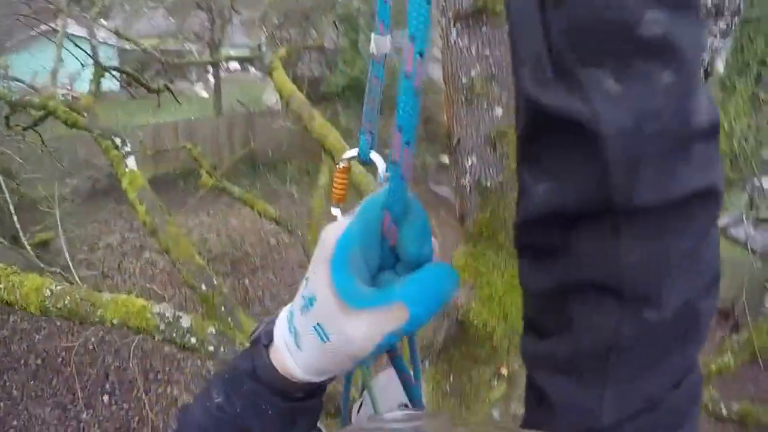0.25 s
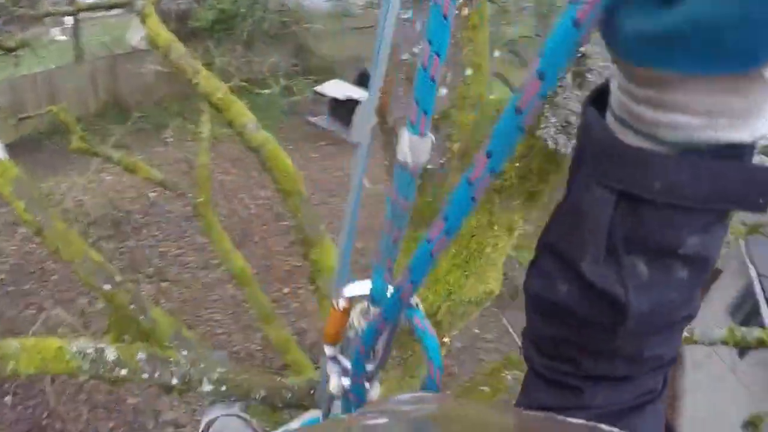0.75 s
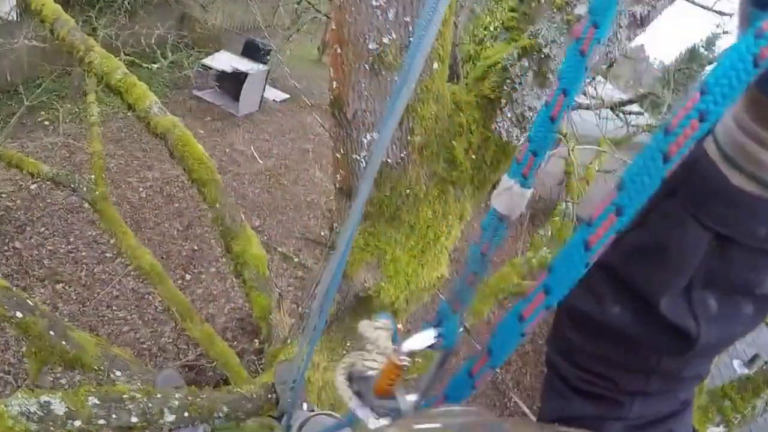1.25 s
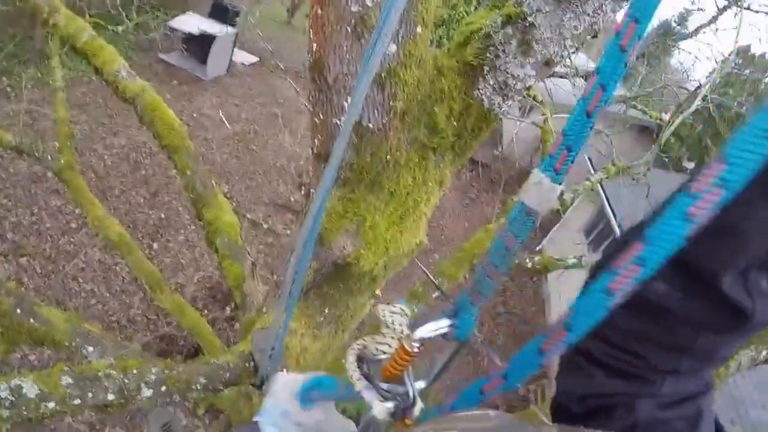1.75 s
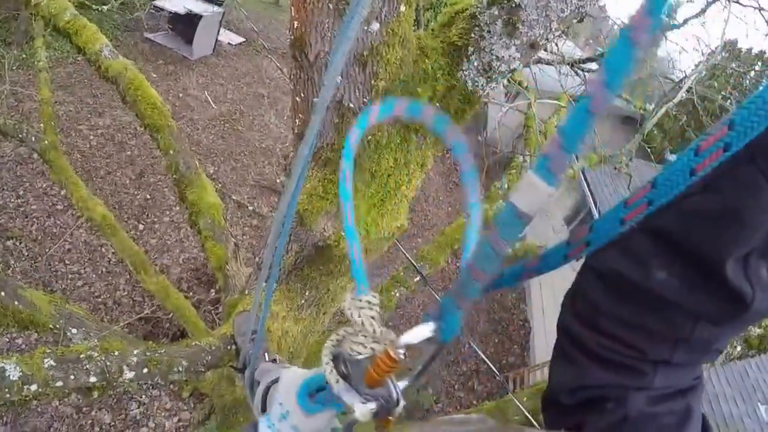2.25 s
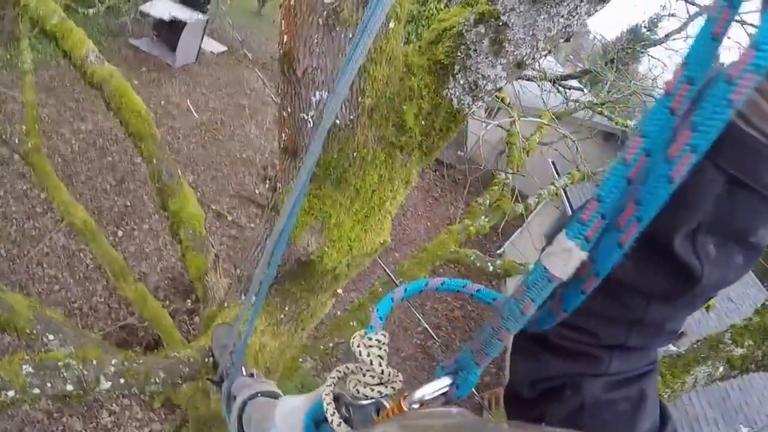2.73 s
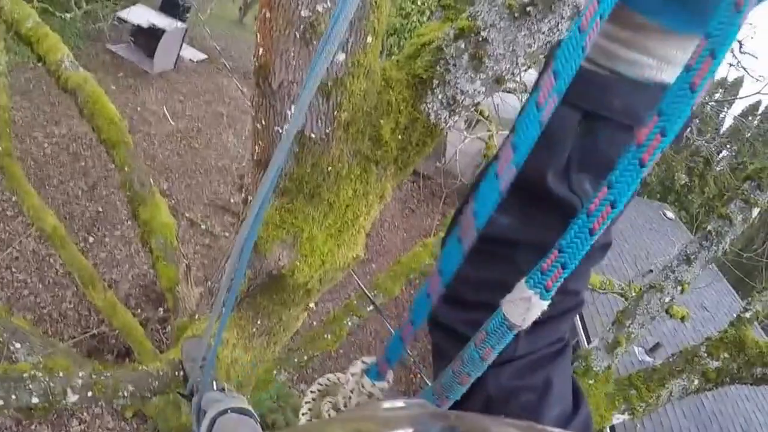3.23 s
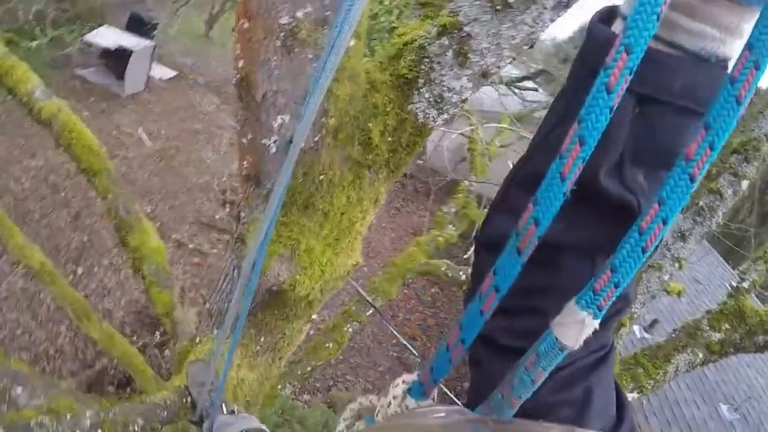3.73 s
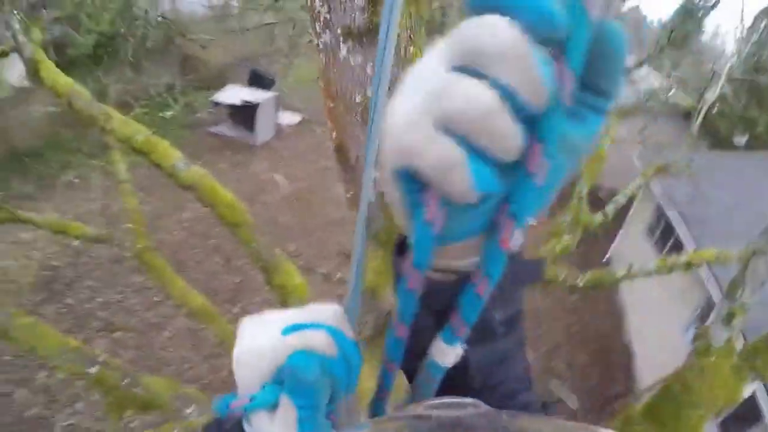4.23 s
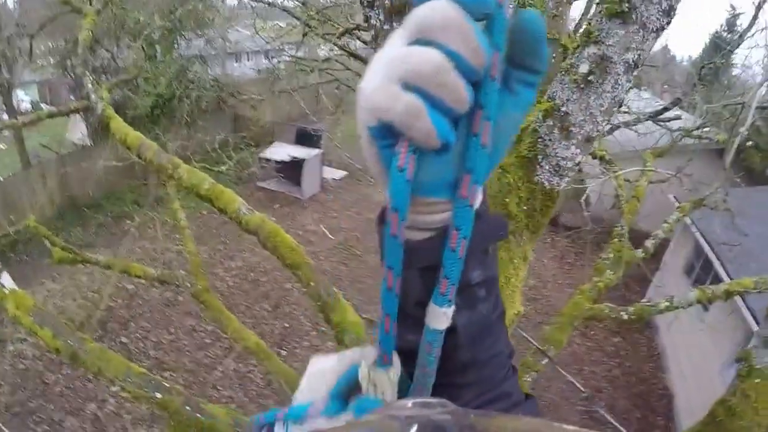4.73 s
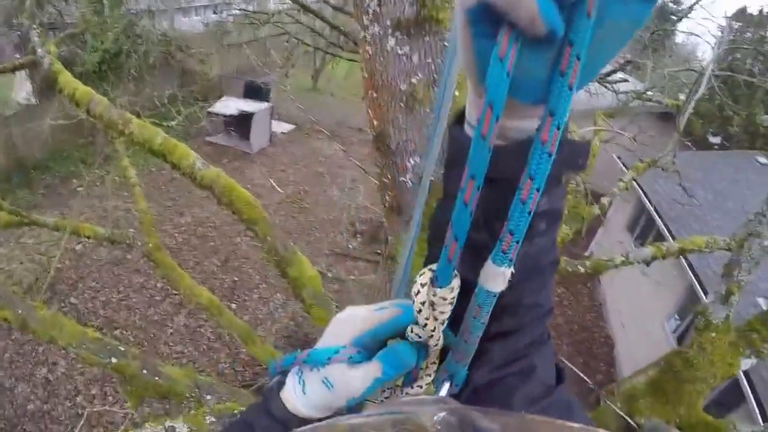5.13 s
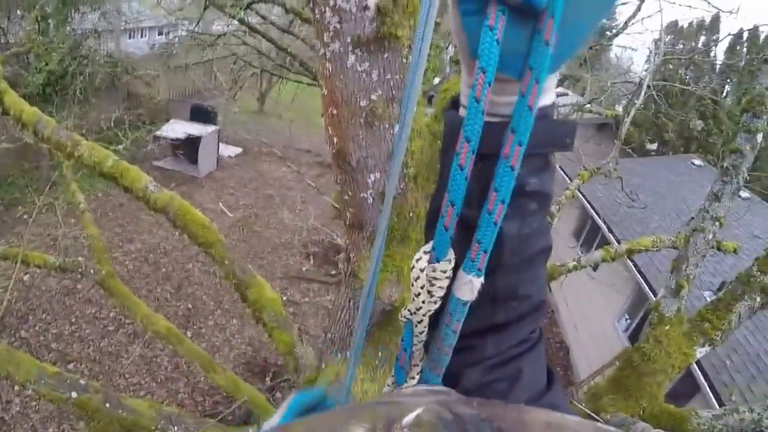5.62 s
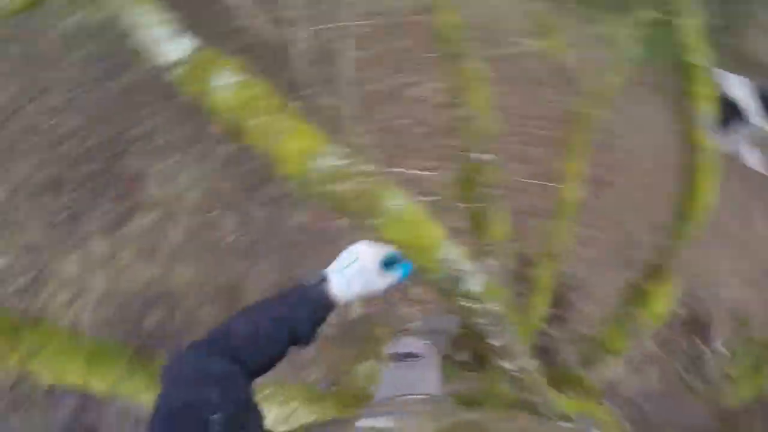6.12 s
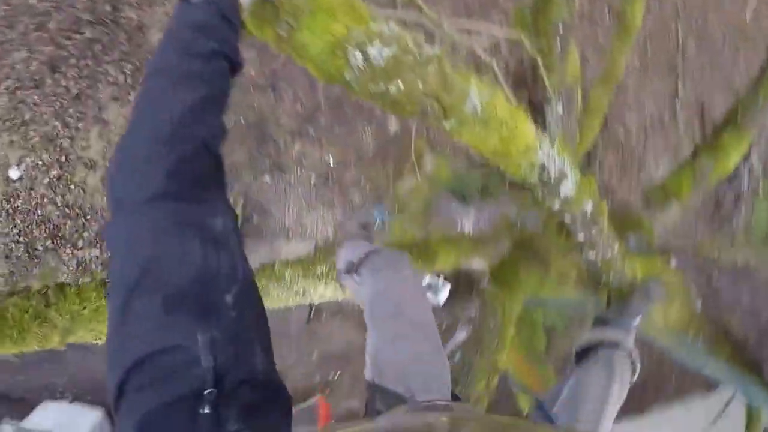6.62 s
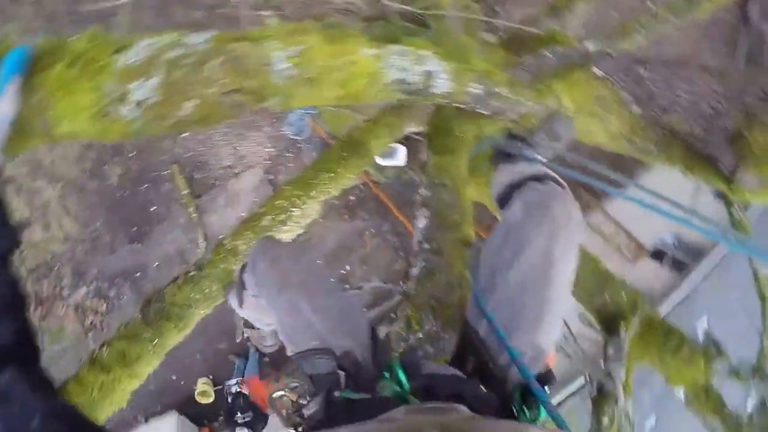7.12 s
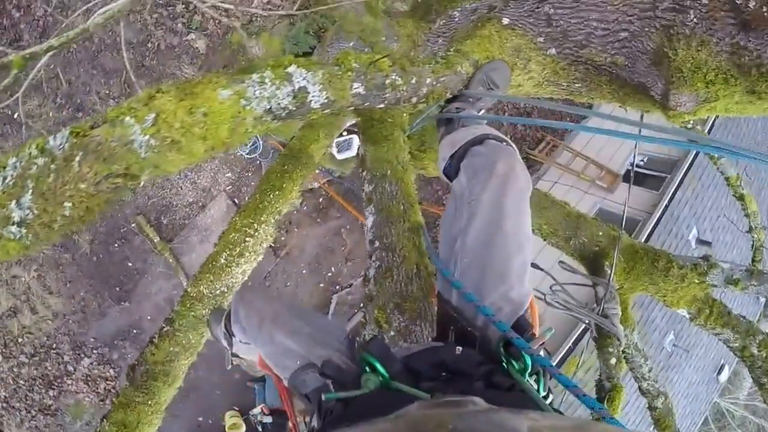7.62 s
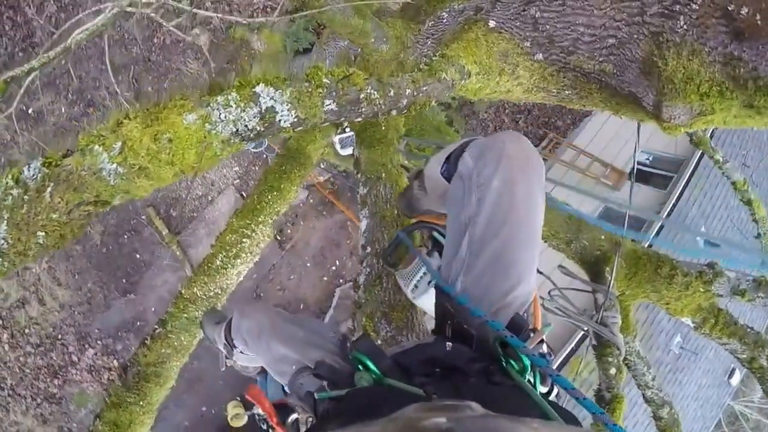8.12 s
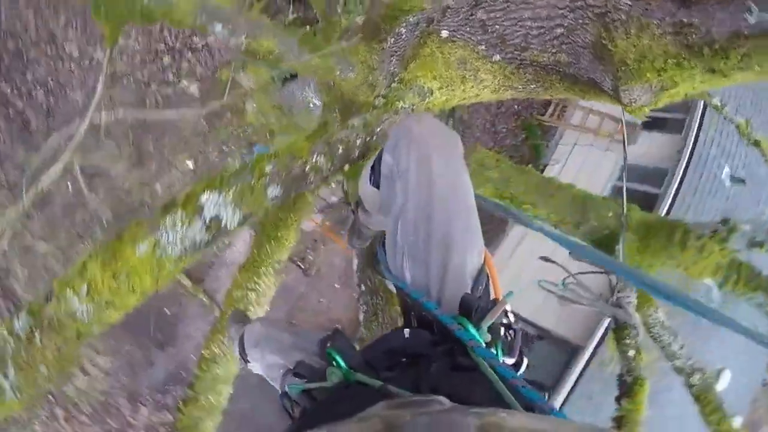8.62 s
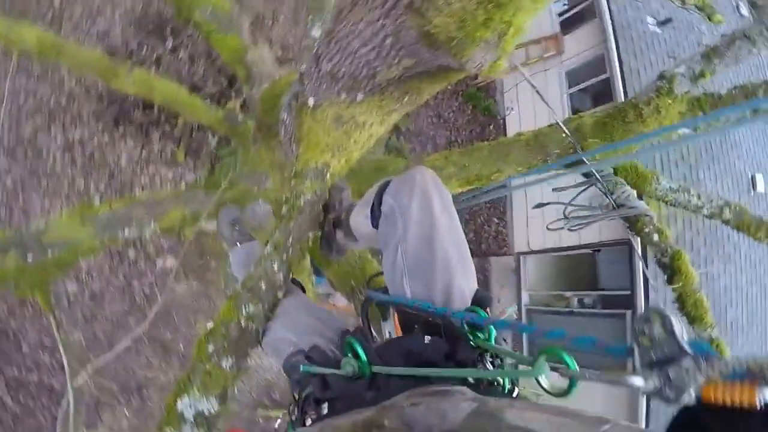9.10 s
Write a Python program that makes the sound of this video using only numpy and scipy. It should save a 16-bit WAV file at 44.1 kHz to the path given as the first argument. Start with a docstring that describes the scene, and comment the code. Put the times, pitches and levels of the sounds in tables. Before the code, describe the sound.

A steady but lumpy two-stroke idle runs throughout, hard firings every few turns with weak sputters between. Low air rumble and cloth scuffs buffet the encased wearable microphone. Gear raps the housing near the middle and again two thirds through, rope rubs softly, and clips click. As the hanging saw swings round, its metallic chatter comes forward with a shifting, hollow colour. Open air, almost no reverberation.

```python
"""High in a tree, a two-stroke chainsaw idles on a climber's harness, heard by a small camera in a housing.
It pops every turn, fires hard about every fourth and sputters in between: pulses at each turn of the
crankshaft ring the muffler, and grainy noise swelling with them makes the case, clatter and chain.
Late on the saw swings round and its clatter comes forward, through moving comb reflections.
Metal clips click, gear knocks, rope and cloth rub, and moving air buffets the microphone."""
import sys
import numpy as np
from scipy import signal
from scipy.fft import rfft, irfft
from scipy.io import wavfile
from scipy.ndimage import uniform_filter1d

SR = 44100
rng = np.random.default_rng(int(sys.argv[2]) if len(sys.argv) > 2 else 0)


def transcribe(u):
    """Save the signal u as a 16-bit wav file named by the first command-line argument.

    u: samples, shape (n,) or (channels, n), limited to [-1, 1]; the rate is SR.
    q: integer samples, one column per channel.
    """
    v = np.clip(np.atleast_2d(u).T, -1, 1)
    q = np.round(v * 32767).astype(np.int16)
    wavfile.write(sys.argv[1], SR, q)


N = 412776
TIME = np.arange(N) / SR
GATE_HZ, GATE_WIDTH_HZ = 7230, 74  # thin ring of the metal hardware on the harness


def undb(db):
    """Decibels to gain."""
    return 10 ** (np.asarray(db) / 20)


def unit(x):
    """Scale to an rms of one."""
    return x / np.sqrt(np.mean(x ** 2))


def curves(table):
    """Each column of a table, joined by straight lines in time."""
    s, *columns = np.transpose(table)
    return [np.interp(TIME, s, c) for c in columns]


def noise():
    """White noise."""
    return rng.standard_normal(N)


def colour(x, points, size=8192):
    """Pass a sound through a causal (minimum-phase) body with this spectrum, at unit power gain."""
    hz, db = np.transpose(points)
    log_hz = np.log(np.maximum(np.fft.rfftfreq(size, 1 / SR), 1))
    gain = undb(np.interp(log_hz, np.log(hz), db))
    # folding the cepstrum forward in time makes the body answer only after it is excited
    cepstrum = irfft(np.log(gain))
    cepstrum[1:size // 2] *= 2
    cepstrum[size // 2 + 1:] = 0
    response = irfft(np.exp(rfft(cepstrum)))
    return signal.fftconvolve(x, response / np.linalg.norm(response))[:N]


def resonance(x, hz, width):
    """One resonance, gain one at its centre."""
    return signal.lfilter(*signal.iirpeak(hz, hz / width, SR), x)


def strikes(times, sizes):
    """One impulse at each moment."""
    out = np.zeros(N)
    samples = np.clip(np.asarray(times) * SR, 0, N - 1).astype(int)
    np.add.at(out, samples, sizes)
    return out


def fade(x, decay_s):
    """Give each impulse an exponential tail."""
    return signal.lfilter([1], [1, -np.exp(-1 / (abs(decay_s) * SR))], x)


def burst(times, sizes, rise_s, decay_s):
    """Envelopes that swell up to each moment and die away after it."""
    hits = strikes(times, sizes)
    swelling = fade(hits[::-1], rise_s)[::-1]
    return fade(hits, decay_s) + swelling - hits


def bell(s, length):
    """A smooth swell and fade around a moment."""
    return np.exp(-2 * ((TIME - s) / length * 2) ** 2)


def grit(grain_db, grain_s):
    """Noise made of many tiny contacts of uneven strength."""
    steps = np.arange(0, N / SR + grain_s, grain_s)
    strength = np.clip(noise()[:len(steps)], -2, 2)
    return unit(noise() * undb(grain_db * np.interp(TIME, steps, strength)))


def strokes(table, grain_db=4):
    """Fibres catch and slip: grainy noise that swells and fades with each stroke."""
    swell = sum(undb(db) * bell(s, length) for s, length, db in table)
    grain = unit(uniform_filter1d(noise(), size=120))
    return swell * unit(noise() * undb(grain_db * grain))


def gliding(x, hz, width):
    """A steep resonance whose centre moves: shift the centre to zero, smooth twice, shift back."""
    turn = np.exp(2j * np.pi * np.cumsum(hz) / SR)
    tail_s = 1 / (np.pi * width)
    return np.real(turn * fade(fade(x / turn, tail_s), tail_s))


def reflect(x, surface):
    """Add a surface's moving reflection: a slowly gliding comb."""
    hz, share = curves(surface)
    late = np.interp(TIME - 1 / hz, TIME, x)
    return (x + share * late) / np.sqrt(1 + share ** 2)


def shell(x):
    """The plastic housing rings with its modes and passes little bass or treble."""
    # the camera housing's modes: (centre [Hz], width [Hz], gain [dB])
    housing_modes = [(663, 170, 7), (1197, 110, 8), (1440, 136, 13.5), (1970, 230, -13), (2265, 110, 7.5),
                     (2610, 120, -29), (5570, 100, 2)]
    modes = sum(undb(db) * resonance(x, hz, width) for hz, width, db in housing_modes)
    return signal.sosfilt(signal.butter(2, [500, 4000], "band", fs=SR, output="sos"), modes)


def hiss(level_db=-71):
    """Faint steady noise, drawn afresh for each channel."""
    # colour of the hiss: (frequency [Hz], relative level [dB])
    hiss_colour = [(30, 7), (70, -16), (250, 8), (700, -6), (1500, 0), (3200, 3), (6000, -6), (10000, -22),
                   (15000, -15)]
    return undb(level_db) * colour(noise(), hiss_colour)


def eddies(points, size=4000):
    """Low turbulence of even strength."""
    x = colour(noise(), points)
    return x / np.sqrt(uniform_filter1d(x ** 2, size=size))


def air():
    """Light air plays on the microphone; each gust adds a swell of rumble and flutter."""
    # light air that never stops: (time [s], rumble [dB], flutter [dB])
    breeze = [(0, -37, -44.5), (1.8, -35.5, -58.5), (3.7, -38, -55), (4.6, -37.5, -49.5), (6.3, -34, -50.5),
              (7.8, -37.5, -52), (9.36, -32, -53.5)]
    # gusts on the microphone as the climber moves: (time [s], length [s], rumble [dB], flutter [dB])
    gusts = [(0.056, 0.33, -27.5, -50), (0.317, 0.16, -23.5, -40.5), (1.378, 0.36, -24, -48),
             (1.523, 0.17, -25, -40), (1.88, 0.11, -26, -61), (3.04, 0.17, -26.5, -78),
             (4.031, 0.1, -23.5, -34.5), (4.17, 0.22, -23, -37.5), (4.384, 0.33, -20, -33.5),
             (4.747, 0.69, -31, -44.5), (6.192, 0.25, -27, -33.5), (6.63, 0.28, -28, -66),
             (7.283, 0.58, -36, -66), (8.154, 0.08, -31, -39), (8.462, 0.12, -41, -39.5),
             (8.791, 0.17, -31.5, -37), (8.984, 0.2, -33.5, -49)]
    # colour of the deep rumble: (frequency [Hz], relative level [dB])
    rumble_colour = [(8, 16.5), (20, 20), (33, 1), (45, 5.5), (65, 1), (100, -10), (200, -53), (3000, -110)]
    # colour of the flutter above it: (frequency [Hz], relative level [dB])
    flutter_colour = [(40, -12), (75, -12.5), (130, 2), (170, -17), (250, -21), (500, -80), (6000, -100)]
    rumble, flutter = undb(curves(breeze))
    for s, length, rumble_db, flutter_db in gusts:
        swell = bell(s, length)
        # independent gusts add in power
        rumble = np.hypot(rumble, undb(rumble_db) * swell)
        flutter = np.hypot(flutter, undb(flutter_db) * swell)
    return eddies(rumble_colour) * rumble + eddies(flutter_colour) * flutter


def bumps(cycles=0.17, soft=0.35):
    """Body movement reaches the microphone as heavily damped low swings with a padded onset."""
    # soft bumps of the climber's body: (time [s], level before damping [dB], pitch [Hz])
    body_bumps = [(0.302, 2.5, 28), (0.612, -10, 45), (0.754, -8, 59), (0.856, -12.5, 38),
                  (1.153, -29, 36.2), (1.405, -15, 45), (1.54, -8, 50), (1.85, -9, 30), (4.15, -6, 35),
                  (4.324, 1, 28), (4.354, -8, 128), (4.422, -11, 99), (6.149, -30, 105), (6.87, -11, 24.2),
                  (7.215, -8, 24)]
    out = 0
    for s, db, hz in body_bumps:
        phase = np.maximum(TIME - s, 0) * hz  # in cycles
        swing = np.sin(2 * np.pi * phase)
        padding = np.tanh(phase / soft)
        damping = np.exp(-np.minimum(phase / cycles, 20))
        out = out - undb(db) * swing * padding * damping
    return out


def rubs(scuff_db=7):
    """Rope hisses through its hitch; cloth scuffs reach the housing."""
    # rope and cloth sliding: (time [s], length [s], level [dB])
    slides = [(4.42, 0.13, -58), (4.806, 0.17, -54), (5.25, 0.21, -49.5), (6.84, 0.29, -53.5)]
    # gloves and sleeves scuffing: (time [s], length [s], level before scuff_db and the housing [dB])
    scuffs = [(.3, 0.36, -52), (1.47, 0.21, -54), (4.06, 0.056, -49.5), (4.305, 0.049, -48.5),
              (4.365, 0.033, -60), (4.44, 0.055, -44.5), (4.8, 0.54, -55), (6.17, 0.19, -52.5),
              (6.5, .1, -53), (8.96, .08, -48)]
    # colour of the sliding rope: (frequency [Hz], relative level [dB])
    rope_colour = [(700, -24), (1430, -9), (2400, -22), (2950, -12), (3250, 2), (3600, -5), (4100, -7),
                   (4600, -3), (5400, -18), (12000, -40)]
    return colour(strokes(slides), rope_colour) + undb(scuff_db) * shell(strokes(scuffs))


def knocks(blow_db=14, chatter_db=6, clack_rise_s=0.0005, scrape_db=-7, scrape_s=0.013):
    """Gear bumps the housing: a blow, a chatter in its shell, a scrape sliding off, the gear's dead clack."""
    # gear knocking near the camera:
    # (time [s], strength before the gains above [dB], clack pitch [Hz], clack peak [dB])
    gear_knocks = [(1.431, -44, 1070, -35), (1.452, -38, 1290, -35), (1.528, -44, 1450, -44),
                   (4.31, -42, 1530, -35), (4.321, -37, 1700, -31), (4.341, -34, 2830, -26),
                   (4.347, -24.5, 1580, -18.5), (4.353, -51, 680, -33), (4.416, -43, 1600, -39),
                   (6.1152, -23, 1570, -25), (6.122, -49, 660, -29), (6.1438, -37, 2380, -26),
                   (6.148, -48, 2280, -31), (6.202, -47, 1900, -38), (6.2136, -28, 1470, -20),
                   (6.231, -51, 1240, -33), (6.236, -47, 700, -34)]
    s, db, _, _ = np.transpose(gear_knocks)
    blow = strikes(s, undb(db + blow_db))
    chatter = noise() * burst(s + .0005, undb(db), .001, .0035)
    scrape = grit(grain_db=1, grain_s=0.0015) * fade(strikes(s, undb(db)), scrape_s)
    width = 1 / (np.pi * clack_rise_s)
    clacks = 0
    for start, _, hz, clack_db in gear_knocks:
        ring = resonance(resonance(strikes([start], [1]), hz, width), hz, width)
        clacks = clacks + undb(clack_db) * ring / abs(ring).max()
    return shell(blow + undb(chatter_db) * chatter + undb(scrape_db) * scrape) + clacks


def clips(ping_db=2, body_db=-10, snap_db=9, width_hz=900, contact_s=0.00091, chatter_s=0.0059):
    # metal clips snapping: (time [s], strength before the gains above [dB], ping pitch [Hz],
    # body re strength [dB], gate ring re strength [dB])
    snaps = [(0.5387, -24, 5700, 2, -44), (1.4516, -36, 5900, 1, -26), (6.1405, -24, 6000, -18, -36),
             (8.931, -31, 6400, 5.5, -4.5), (9.149, -22.5, 4640, -6, -17)]
    body_colour = [(500, -36), (1000, -1), (1250, 5), (1800, 10), (2300, 12), (2600, 4), (2950, 17),
                   (3600, 12), (6000, 1.5), (10000, -18), (13000, -31), (15500, -60)]
    ping, blows, gate = 0, 0, 0
    for s, db, hz, rel_db, gate_db in snaps:
        hit = strikes([s], [1])
        contact = hit + 0.6 * noise() * fade(hit, contact_s)
        ring = resonance(resonance(contact, hz, width_hz), hz, width_hz)
        ping = ping + ring / abs(ring).max() * undb(db + ping_db)
        blows = blows + hit * undb(db + rel_db)
        gate = gate + hit * undb(db + gate_db)
    # the factor undoes the narrow filter's loss on a single impulse
    thin = resonance(gate, GATE_HZ, GATE_WIDTH_HZ) * SR / (2 * np.pi * GATE_WIDTH_HZ)
    clack = undb(snap_db) * blows + undb(body_db) * fade(blows, chatter_s) * noise()
    return ping + thin + colour(clack, body_colour)


def firings(turns, stumble_db=1, scatter_db=2.5):
    """Extra force and thud of each turn: runs keep their beat; between them every third or fourth fires."""
    # runs in which the engine fires hard in a steady beat: (first firing [s], last firing [s],
    # beat [turns per firing], strength before scatter [dB], thud before scatter [dB])
    runs = [(.05, .256, 4, 4, -42), (.339, .498, 4, 3, -36), (.693, .86, 4, 2.5, -40),
            (1.107, 1.268, 4, 3, -41.5), (1.329, 1.449, 3, 3, -52), (1.51, 1.69, 3, 3, -50),
            (1.979, 2.245, 4, 3.5, -50), (2.329, 2.74, 4, 5.5, -52), (2.95, 3.08, 3, 4, -52),
            (3.165, 3.23, 3, 3.5, -47), (3.5, 3.684, 3, 5, -51), (3.786, 4.112, 4, 8, -54),
            (4.344, 4.919, 4, 4.5, -42), (5.2, 5.344, 4, 4.5, -39.5), (5.548, 6.038, 4, 7, -35.5),
            (6.12, 6.448, 4, 7, -55), (6.55, 6.61, 3, 3.5, -52), (6.768, 6.852, 4, 6.5, -49),
            (7.062, 7.145, 4, 5, -37.5), (7.208, 7.616, 4, 8.5, -31), (7.678, 7.741, 3, 6, -41),
            (7.865, 7.928, 3, 3.5, -44), (7.99, 8.237, 4, 5, -38.5), (8.298, 8.42, 2, 2.5, -46),
            (8.44, 8.926, 4, 7, -37), (9.025, 9.27, 3, 2, -41)]
    force, thud = np.zeros((2, len(turns)))
    scatter = undb(scatter_db * rng.standard_normal(len(turns)))
    stumbles = np.cumsum(rng.integers(3, 5, len(turns)))
    force[stumbles[stumbles < len(turns)]] = undb(stumble_db) - 1
    # clear the stumbles in and just around each run
    for start, end, *_ in runs:
        force[(turns > start - .05) & (turns < end + .05)] = 0
    for start, end, beat, db, thud_db in runs:
        first, last = np.argmin(abs(turns - start)), np.argmin(abs(turns - end))
        fired = slice(first, last + 1, max(round(beat), 1))
        force[fired], thud[fired] = undb(db) - 1, undb(thud_db)
    return force * scatter, thud * scatter


def crankshaft(jitter_s=0.00054, wander_s=0.00028):
    """Moment of every turn as the idle hunts around its mean speed, with its firing force and thud."""
    # crankshaft at idle: (time [s], count [turns completed])
    crank = [(0.008, 1), (0.2976, 15), (0.5587, 28), (0.7982, 40), (1.1064, 55), (1.3497, 67), (1.7932, 89),
             (2.207, 109), (2.5562, 126), (2.8896, 142), (3.1442, 154), (3.4577, 169), (3.8899, 190),
             (4.2586, 208), (4.5551, 222), (5.0782, 248), (5.6511, 276), (6.0999, 298), (6.39, 312),
             (6.7477, 330), (7.0382, 344), (7.3527, 359), (7.6977, 376), (7.9904, 390), (8.3598, 408),
             (8.7037, 425), (9.1077, 445), (9.345, 456)]
    s, count = np.transpose(crank)
    turns = np.interp(np.arange(count[0], count[-1] + 1), count, s)
    jitter, drift = rng.standard_normal((len(turns), 2)).T
    wander = unit(uniform_filter1d(uniform_filter1d(drift, size=5), size=4))
    force, thud = firings(turns)  # force is zero on a turn that does not fire hard
    return turns + jitter_s * jitter + wander_s * wander, force, thud


def puffs(turns, force, scatter_db=1.5):
    """Exhaust puff sizes: full at a firing, faint after, growing as mixture gathers; sputters set their own."""
    # exhaust puff on a firing and on each turn after it, before scatter: (level [dB])
    puff_steps = [0, -12, -12, -5, -2]
    # sputters, when the mixture burns late and every turn pops in the muffler:
    # (start [s], end [s], puff before scatter [dB])
    sputters = [(.49, .59, 2.5), (1.79, 1.88, -3.5), (2.82, 2.9, 3), (3.36, 3.44, 3), (4.15, 4.3, 7.5),
                (5.03, 5.1, 3.5), (5.44, 5.51, 3), (6.65, 6.73, -4), (6.92, 7.13, 2), (7.75, 7.85, 3),
                (8.28, 8.39, 0.5), (9.07, 9.14, 5.5)]
    count = np.arange(len(turns))
    since = count - np.maximum.accumulate(np.where(force > 0, count, 0))  # turns since a firing
    db = np.array(puff_steps, float)[np.minimum(since, len(puff_steps) - 1)]
    for start, end, sputter_db in sputters:
        db[(turns > start) & (turns < end)] = sputter_db
    return undb(db + scatter_db * np.clip(rng.standard_normal(len(turns)), -2, 2))


def covers(x, hollow_hz=2500, hollow_width_hz=200, hollow=0.14):
    """The saw's covers add their narrow rings and leave a hollow in between."""
    # narrow rings of the saw's covers and bar: (centre [Hz], width [Hz], gain [dB])
    cover_rings = [(1400, 70, -7), (2775, 30, 3), (3245, 30, -3), (4680, 200, -11)]
    rings = sum(undb(db) * resonance(x, hz, width) for hz, width, db in cover_rings)
    return x + rings - hollow * resonance(x, hollow_hz, hollow_width_hz)


def hollow_putts(turns, puff, width_hz=140, lead_s=0.0045, flow_db=-18):
    """Every exhaust puff rings one hollow note, which wanders as the saw swings."""
    # the hollow note of the exhaust pops: (time [s], centre [Hz], level [dB])
    hollow_note = [(4.5, 674, -78), (5.1, 634, -62), (6.0, 670, -69), (6.45, 684, -59), (6.8, 670, -63),
                   (7.0, 606, -57), (7.4, 670, -62), (7.85, 790, -66), (8.1, 810, -76), (8.35, 594, -53),
                   (8.7, 580, -71), (9.15, 585, -61)]
    hz, db = curves(hollow_note)
    pops = unit(strikes(turns - lead_s, puff)) + undb(flow_db) * noise()
    return undb(db) * unit(gliding(pops, hz, width_hz))


def whirrs(turns, force, lead_s=0.0103):
    """Each turn shakes the saw's covers; their resonances drift and swell as it swings on its strap."""
    # drifting bright resonances: (width [Hz], path of (time [s], centre [Hz], level [dB]))
    drifting = [(142, [(6.6, 2790, -86), (6.95, 2780, -64), (7.45, 2760, -76), (7.9, 2740, -69),
                (8.3, 2750, -56), (8.85, 2700, -50.5), (9.36, 2790, -55)]), (230, [(6.6, 3080, -83),
                (7.0, 3300, -62), (7.4, 3210, -56), (7.9, 3460, -57.5), (8.3, 3420, -48.5),
                (8.8, 3380, -60), (9.36, 3400, -58)]), (200, [(6.2, 4570, -82), (6.5, 4570, -62),
                (7.4, 4500, -66), (7.9, 4900, -61), (8.3, 4980, -60), (8.8, 4670, -72), (9.36, 4540, -62)]),
                (328, [(6.6, 5350, -78), (6.95, 5460, -58), (7.4, 5670, -65), (7.9, 5620, -60.5),
                (8.8, 5220, -65), (9.36, 5300, -72)])]
    shake = .15 + burst(turns - lead_s, 1 + .9 * (force > 0), 0.001, .0036)
    out = 0
    for width, path in drifting:
        hz, db = curves(path)
        out = out + undb(db) * unit(gliding(noise() * shake, hz, width))
    return out


def thuds(turns, sizes, lead_s=0.002926, buzz=0.071, buzz_s=0.0054):
    """A hard firing strikes the cylinder cover, which buzzes briefly and rings with two beating notes."""
    # the cylinder cover's notes under a hard firing: (centre [Hz], width [Hz], relative level [dB])
    cover_notes = [(1256, 37, -13), (1386, 100, -0.5)]
    hits = strikes(turns - lead_s, sizes)
    push = hits + buzz * noise() * fade(hits, buzz_s)
    # the factor undoes each narrow filter's loss on a single impulse
    return sum(undb(db) * resonance(push, hz, width) * SR / (2 * np.pi * width)
               for hz, width, db in cover_notes)


def rattle(turns, force, loose=0.014, jingle_db=-7, lead_s=0.00018, rise_s=.0014, decay_s=0.0055):
    """Every hard firing jolts the chain and the hardware it hangs from; the other turns only tick them."""
    # colour of the jolted chain: (frequency [Hz], relative level [dB])
    chain_colour = [(300, -45), (600, 6), (950, -8), (1380, 5), (2100, -14), (2800, -14), (3400, 7.5),
                    (4500, -0.5), (6000, -3), (8000, -4.5), (10000, -13.5), (13000, -11.5), (15500, -13)]
    jolt = burst(turns - lead_s, loose + force, rise_s, decay_s)
    chain = covers(colour(grit(grain_db=5.5, grain_s=0.00084) * jolt, chain_colour))
    return chain + undb(jingle_db) * resonance(chain, GATE_HZ, GATE_WIDTH_HZ)


def clatter(turns, force, lead_s=.007, tick=0.17):
    """Piston and clutch slap once a turn on the way up, harder before a firing: a tick and a short rattle."""
    # colour of the slap: (frequency [Hz], relative level [dB])
    slap_colour = [(450, 3.5), (630, 5.5), (950, -10.5), (1350, -1), (2200, 2.5), (2750, 8.5), (3350, 7),
                   (4200, 1), (5000, 4.5), (5700, -2.5), (6600, -11), (8200, -6.5), (10000, -27.5),
                   (12500, -15.5), (15500, -38)]
    size = undb(1.3 * rng.standard_normal(len(turns))) * (1 + 1.05 * (force > 0))
    slap = .22 + burst(turns - lead_s, size, .0009, .0052)
    ticks = unit(strikes(turns - lead_s, size))
    loose_metal = unit(grit(grain_db=2, grain_s=0.0018) * slap)
    return unit(covers(colour(loose_metal + tick * ticks, slap_colour)))


def engine_case(turns, force, throb=0.25, kick=1.8, lead_s=0.0011):
    """Flywheel fan and crankcase whirr on, swelling with each compression and more with a firing."""
    # colour of the engine case: (frequency [Hz], relative level [dB])
    case_colour = [(200, 7), (400, 3), (650, 0), (980, 1), (1200, 6.5), (1600, 6), (2200, 3), (2900, 1),
                   (3450, 1.5), (4600, -7), (6000, -11.5), (8000, -19), (10000, -22), (15000, -27)]
    size = undb(3 * rng.standard_normal(len(turns))) * (1 + kick * force)
    swell = burst(turns - lead_s, size, .003, .005)
    whirr = grit(grain_db=1.5, grain_s=.003) * (1 + throb * swell)
    return unit(covers(colour(whirr, case_colour)))


def exhaust(turns, puff, lead_s=0.003304, echo_s=0.006004, echo=0.2, crack_echo=0.44,
            smoothing=0.22, flow_db=-10, note_width_hz=190):
    """The port opens once a turn: a puff and its return crack and ring the muffler over a steady flow."""
    # the exhaust's hum and crack waver as the saw hangs and swings; levels before the saw's exhaust gain:
    # (time [s], hum [dB], crack [dB])
    outlet = [(0, -50, -51), (1.3, -54, -55), (2.5, -49, -53), (3.7, -50, -56), (4.6, -54.5, -59),
              (5.8, -51.5, -57.5), (6.45, -50, -51.5), (7.5, -49, -52.5), (8.1, -50.5, -51.5),
              (8.7, -56, -62.5), (9.36, -52.5, -54)]
    # the muffler's main note, which sinks overall as the saw swings; level before the same gain:
    # (time [s], centre [Hz], level [dB])
    main_note = [(0, 423, -49.5), (2.2, 389, -50.5), (3.2, 394, -51), (5, 369, -53), (6.4, 371, -51),
                 (7.1, 337, -51), (8.2, 316, -54), (8.6, 235, -58), (9.36, 270, -55)]
    # colour of the muffler's hum: (frequency [Hz], relative level [dB])
    hum_colour = [(90, 2), (150, -3), (195, 3), (215, -2), (243, 7), (275, -4), (340, -10.5), (420, 0.5),
                  (500, -4), (660, -7), (900, -21), (1600, -41), (2500, -47), (5000, -67), (15000, -74)]
    # colour of a sharp exhaust pop: (frequency [Hz], relative level [dB])
    crack_colour = [(200, -24.5), (450, 13), (700, 14), (1000, 0.5), (1700, 8.5), (2400, -14), (5000, -27),
                    (15000, -48)]
    hum_db, crack_db = curves(outlet)
    note_hz, note_db = curves(main_note)
    opens = turns - lead_s
    returns = opens + echo_s + 0.0003 * rng.standard_normal(len(turns))
    size = puff ** smoothing  # the muffler evens out the puffs
    gas = unit(strikes(opens, size) + strikes(returns, echo * size)) + undb(flow_db) * noise()
    hum = unit(colour(gas, hum_colour))
    note = unit(gliding(gas, note_hz, note_width_hz))
    crack = unit(colour(strikes(opens, puff) + strikes(returns, crack_echo * puff), crack_colour))
    return undb(hum_db) * hum + undb(note_db) * note + undb(crack_db) * crack


def chainsaw(exhaust_gain_db=-1.0, case_gain_db=1, clatter_gain_db=6, rattle_gain_db=5,
             shade_db=-60, fan_away=0.47, bark=0.27):
    """The idling saw; as it swings out, the clutch side comes into the open and the fan side turns away."""
    # how the hanging saw is heard, before the gains above: (time [s], engine case [dB], clatter [dB])
    saw_levels = [(0, -47.5, -60.5), (1.1, -49, -59), (3.1, -48.5, -57.5), (3.9, -49, -59),
                  (4.35, -47.5, -57), (5.4, -48, -57.5), (6.55, -50, -58), (6.95, -46, -55.5),
                  (7.75, -45.5, -54.5), (8.25, -45, -50.5), (8.9, -45.5, -52.5), (9.36, -46.5, -57.5)]
    # the trunk's reflection, whose delay changes as the saw swings:
    # (time [s], first reinforced pitch [Hz], strength [0-1])
    trunk = [(0, 430, 0), (1.202, 383, 0), (2.2, 398, 0), (3.1, 420, 0.15), (4.1, 408, 0.15),
             (5.0, 387, 0.25), (6.3, 366, 0.17), (6.7, 346, 0.23), (7.05, 310, 0.46), (7.6, 318, 0.3),
             (8.3, 300, 0.03), (8.6, 265, 0.3), (9.36, 258, 0.8)]
    # the climber's leg mirrors the clatter once the saw swings beside it:
    # (time [s], first reinforced pitch [Hz], strength [0-1])
    leg = [(6.3, 1530, 0), (6.8, 1630, 0), (7.15, 1670, 0.16), (7.7, 1840, 0.06), (8.2, 1640, 0.02),
           (9.36, 1540, 0.2)]
    case_db, clatter_db = curves(saw_levels)
    turns, force, thud = crankshaft()
    puff = puffs(turns, force)
    facing = np.clip(1 - undb(2 * (shade_db - clatter_db)), .05, 1)  # share of the clatter not shaded

    pops = exhaust(turns, puff) * undb(exhaust_gain_db)
    case = engine_case(turns, force) * undb(case_db + case_gain_db) * (1 - fan_away * facing ** 2)
    slaps = clatter(turns, force) * np.sqrt(facing) * undb(clatter_db + clatter_gain_db)
    chain = rattle(turns, force) * undb((case_db + clatter_db) / 2 + rattle_gain_db)
    metal = reflect(case + slaps + chain + thuds(turns, thud), leg)

    # mossy bark returns the bright sounds less well
    metal_at_trunk = metal + np.clip(bark, 0, 1) * (reflect(metal, trunk) - metal)
    return reflect(pops, trunk) + metal_at_trunk + whirrs(turns, force) + hollow_putts(turns, puff)


def scene():
    """Everything enters the closed housing as one sound, alike in both channels but for a faint hiss."""
    sound = air() + bumps() + rubs() + knocks() + clips() + chainsaw()
    return np.array([sound + hiss() for _ in range(2)])


def record(dry, notch_hz=3900, notch_width_hz=560, depth=0.77, top_hz=15300):
    """The microphone blocks the deepest sway, the housing cancels a narrow band, the recorder cuts the top."""
    heard = signal.sosfilt(signal.butter(1, 10, "high", fs=SR, output="sos"), dry)
    housed = heard - depth * resonance(heard, notch_hz, notch_width_hz)
    return signal.sosfilt(signal.ellip(10, .2, 70, top_hz, fs=SR, output="sos"), housed)


dry = scene()
out = record(dry)
transcribe(out)
```